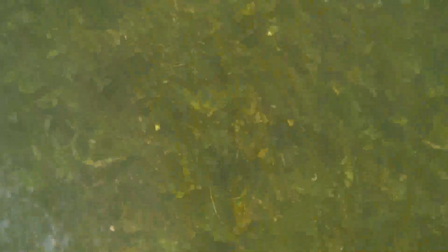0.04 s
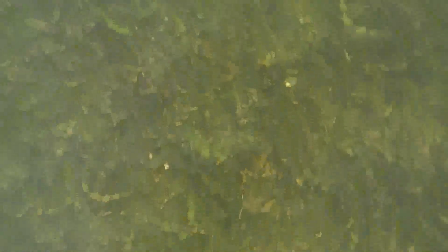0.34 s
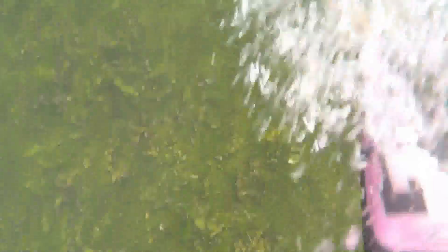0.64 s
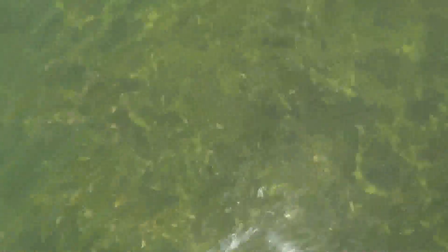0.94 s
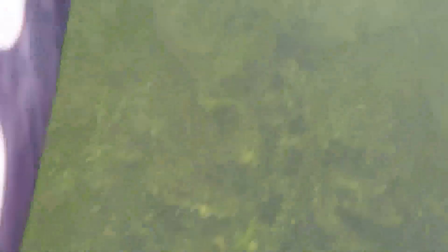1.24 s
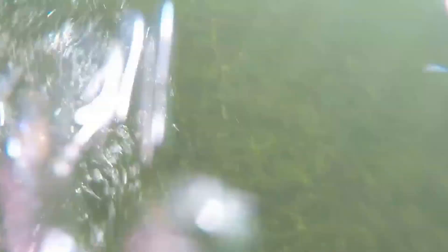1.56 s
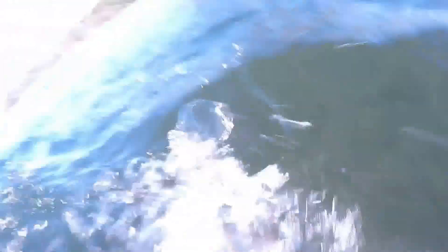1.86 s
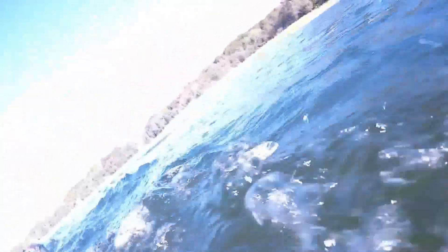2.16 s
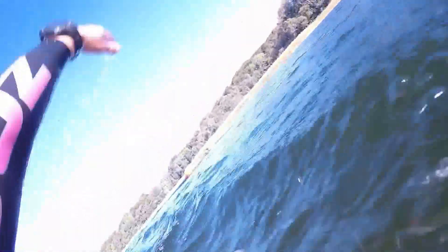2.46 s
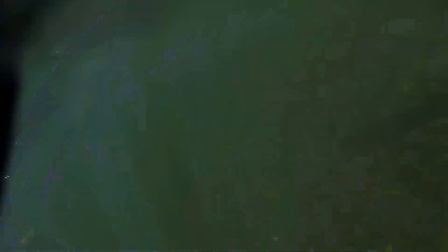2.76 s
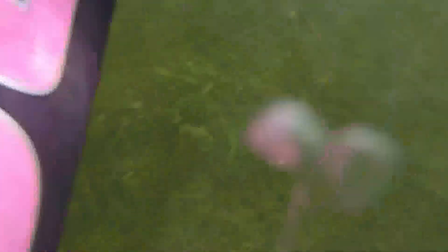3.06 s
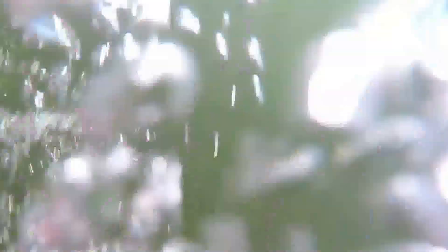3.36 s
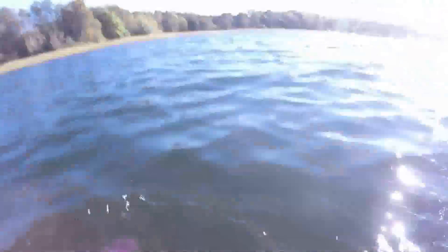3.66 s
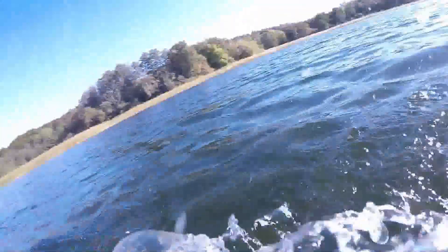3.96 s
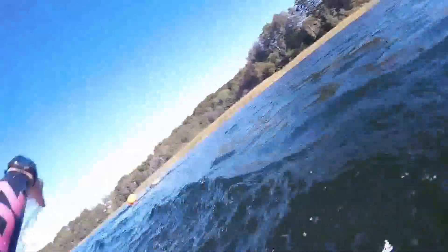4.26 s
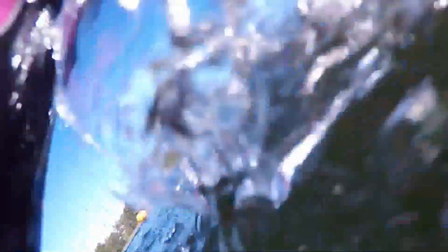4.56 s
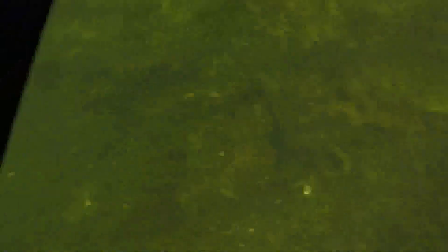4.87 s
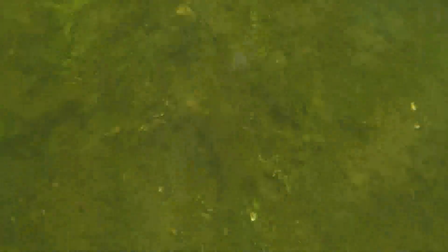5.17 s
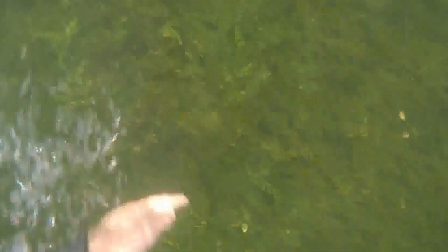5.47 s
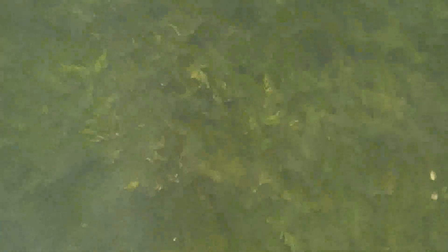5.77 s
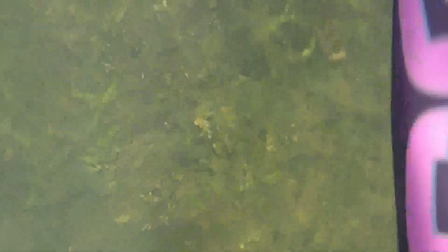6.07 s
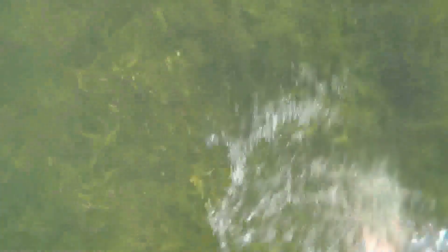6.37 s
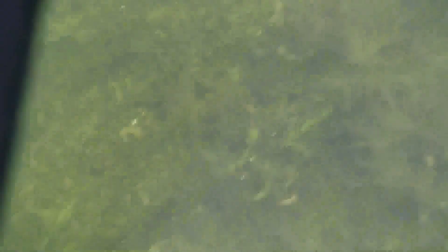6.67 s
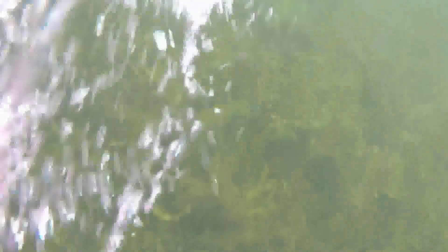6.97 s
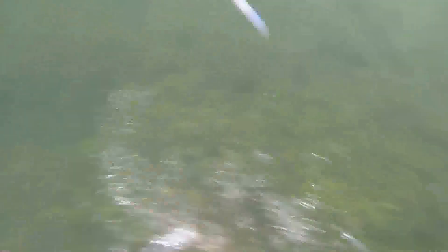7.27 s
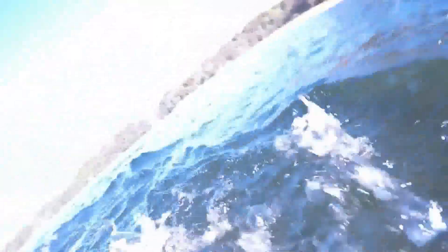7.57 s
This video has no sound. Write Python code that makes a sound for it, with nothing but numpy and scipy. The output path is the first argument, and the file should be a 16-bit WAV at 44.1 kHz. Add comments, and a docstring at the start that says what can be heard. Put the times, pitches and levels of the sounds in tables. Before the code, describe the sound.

A swimmer does front crawl in a lake, heard very close from a microphone worn on the body. It starts under water: big bubbles gurgle, small ones fizz and single ones plop over a low rumble, with drops smacking the housing, a thump near 0.9 seconds and a deep glug around 1.5. From about 1.9 to 2.4 seconds the microphone is in the air, hearing a soft, hissing wash. It plunges back with hard smacks, crackling spray and low thumps until about 3 seconds, followed by lighter bubbling. A second, quieter stretch above water runs from 3.5 to 4.5 seconds and ends in another sharp splash and thump. After a lull of faint bubbling with a few plops, the strokes pick up at 6 seconds. The flow surges with a deep glug just after 7 seconds, and from 7.4 a soft surface wash closes the sound.

```python
"""Front crawl in a lake, from the microphone of a camera worn by the swimmer. It starts under water:
strokes tear up froth and drag air down, so big bubbles gurgle, small ones fizz and single ones plop;
drops smack the housing and waves thump the microphone port. Near 2 s and 4 s it lifts into the air and
hears the soft wash of the wake, then plunges back among hard smacks and thumps. After a lull the strokes
pick up at 6 s, the flow surges just after 7 s, and the microphone ends in the air."""
import sys
import numpy as np
from scipy import signal
from scipy.fft import rfft, irfft, next_fast_len
from scipy.io import wavfile
from scipy.ndimage import uniform_filter1d, map_coordinates

SR = 44100
rng = np.random.default_rng(int(sys.argv[2]) if len(sys.argv) > 2 else 0)


def write(x):
    x = np.atleast_2d(x).T
    wavfile.write(sys.argv[1], SR, np.round(np.clip(x, -1, 1) * 32767).astype(np.int16))


N = 336027
TIME = np.arange(N) / SR

# Levels are relative within each column.
# clouds of air dragged under, an arm's length away: t/s, length/s, level/dB
AIR_CLOUDS = [(0.106, 0.076, -27.5), (0.418, 0.73, -22.5), (1.376, 0.33, -26), (2.757, 0.22, -26),
              (3.225, 0.15, -27), (4.663, 0.23, -23), (5.633, 0.034, -19.5), (6.077, 0.474, -31.5),
              (6.609, 0.033, -22), (6.727, 0.35, -26), (7.037, 0.2, -18.5)]
# the surface torn into froth: t/s, length/s, froth level/dB, spray level/dB
STROKE_SPLASHES = [(0, 0.16, -36.5, -46.5), (0.502, 0.577, -35.5, -42), (0.896, 0.16, -26, -58),
                   (1.606, 0.16, -23, -43), (2.408, 0.099, -23, -38), (2.514, 0.18, -21, -37),
                   (2.743, 0.09, -22, -27.5), (2.88, 0.14, -32.5, -54), (3.289, 0.19, -30, -43),
                   (4.466, 0.026, -21.5, -35), (4.567, 0.16, -26.5, -41), (4.652, 0.21, -23, -35),
                   (4.87, 0.98, -37.5, -51.5), (6.044, 0.21, -32, -49), (6.29, 0.17, -24, -37.5),
                   (6.458, 0.19, -28.5, -47.5), (7.074, 0.28, -27, -44.5)]
# single bubbles pinching off close to the housing: t/s, starting f/Hz, level/dB, t60/s
CLOSE_BUBBLES = [(0.133, 364, -1.5, 0.026), (0.1826, 518, -5.5, 0.015), (0.4343, 2720, -6.5, 0.0066),
                 (0.4648, 4230, -7, 0.0033), (0.5053, 560, -12.5, 0.13), (0.541, 530, -10.5, 0.071),
                 (0.576, 562, -7, 0.069), (0.622, 1470, -14.5, 0.019), (.6338, 580, -14, 0.041),
                 (0.778, 4170, -1.5, 0.0017), (0.796, 2920, -13, 0.02), (0.808, 533, -11.5, 0.098),
                 (1.0886, 560, -1.5, 0.024), (1.11, 357, 5, 0.009), (1.4273, 646, -0.5, 0.0058),
                 (1.5264, 2740, -14, .01), (1.676, 556, -10.5, 0.03), (1.7009, 3520, -12, 0.0087),
                 (1.755, 3050, 1, 0.0049), (1.8048, 767, -5.5, 0.033), (2.4348, 895, -18.5, .04),
                 (2.47, 3620, -9, 0.018), (2.4833, 1260, -5.5, 0.012), (2.5802, 3120, -10, 0.019),
                 (2.6653, 2430, -3.5, 0.011), (2.775, 2640, -6.5, 0.0086), (2.8691, 347, -0.5, 0.018),
                 (2.939, 330, -10, 0.027), (3.4725, 1680, -16.5, 0.011), (4.287, 1873, 2.5, 0.015),
                 (4.4896, 2640, 0, 0.012), (4.6148, 1000, -11.5, 0.011), (4.84, 547, -14, 0.063),
                 (5.6479, 330, -16, 0.053), (5.79, 8170, -13.5, 0.0033), (6.127, 292, -10, 0.031),
                 (6.3357, 1390, -6.5, 0.017), (6.4852, 598, -1, 0.018), (6.549, 2850, -12, 0.038),
                 (6.5623, 4470, 2.5, 0.0024), (6.6243, 368, -0.5, 0.015), (6.758, 1195, -12.5, 0.029),
                 (6.7796, 708, -11.5, 0.058), (6.88, 1220, -10, 0.041), (7.0744, 1090, -9, 0.043),
                 (7.102, 740, -5.5, 0.021), (7.142, 700, -7.5, 0.03), (7.191, 336, -11, 0.08),
                 (7.258, 1500, -8.5, 0.032), (7.2824, 2160, -10.5, .01), (7.326, 1900, -1, 0.01),
                 (7.354, 5060, -14.5, 0.0095), (7.3867, 4400, -7, 0.0028)]
# drops right on the housing: t/s, splat level/dB, crack level/dB
DROP_HITS = [(.2648, -22, -24), (.62, -20.5, -36), (.885, -16, -15.5), (1.0098, -6.5, -27),
             (1.042, -13, -13), (1.1959, -8.5, -15), (1.4117, -11, -29), (1.5998, -17.5, -22),
             (1.6597, -7, -12.5), (1.8037, -27, -14), (1.8432, -42, -16.5), (1.8667, -43, -14),
             (2.1605, -20.5, -36), (2.465, -8, -11), (2.5262, -4, 2), (2.621, -4, -12), (2.6353, -4, -19),
             (2.683, -19, -29), (2.7975, -12, -16), (2.8062, -2, -14), (2.8368, -8, -19), (4.4897, -3.5, 1),
             (4.5138, -8, -6), (4.652, -8.5, -16.5), (4.701, -8.5, -12), (4.72, -12.5, -14.5),
             (4.7916, -20, -16), (5.6905, -11.5, -15.5), (6.128, -17, -23), (6.2307, -23, -20),
             (6.2502, -11.5, -28), (6.4278, -13, -15), (6.55, -4, -14.5), (7.337, -10, -28.5)]
# large pockets of air: t/s, length/s, level/dB, settled f/Hz
AIR_POCKETS = [(0.348, 0.11, -22, 246), (0.467, 0.48, -29, 205), (1.439, 0.23, -15, 173.6),
               (2.928, 0.38, -40, 413), (3.265, 0.262, -32.5, 150.8), (6.98, 0.27, -13, 150)]
# waves right on the microphone port: t/s, level/dB, swing f/Hz
PORT_WAVES = [(0.938, -2.5, 37.7), (1.662, -26, 70), (2.56, -10, 74.6), (2.618, -5.5, 47.4), (2.8, 1, 54),
              (2.87, -6, 115), (4.7, 3, 74), (6.476, -3, 34.8)]
# water and air flowing past the housing: t/s, level/dB
FLOW_LEVELS = [(0, -27), (.6, -23.5), (1.1, -24), (1.32, -28.5), (1.72, -17.5), (1.95, -39.5),
               (2.25, -28.5), (2.7, -28.5), (3.13, -37), (3.35, -28.5), (3.8, -47), (4.1, -34), (4.7, -25),
               (5.2, -41), (6.2, -25), (6.65, -23), (6.9, -26), (7.17, -13), (7.45, -35.5)]
# microphone in the air, wake passing: from t/s, to t/s, crest t/s, crest half-width/s, level/dB
SURFACINGS = [(1.863, 2.402, 2.02, 0.55, -40), (3.522, 4.485, 4.08, 0.22, -46.5),
              (7.402, 7.697, 7.55, 0.33, -38)]

# Spectra, all f/Hz, level/dB:
HOUSING_BOOM = [(250, -4), (330, -7.5), (440, -4), (560, -2), (700, -1.5), (1000, -7)]  # the housing booming with the big bubbles
FIZZ_SPECTRUM = [(400, 4), (2900, 6.5), (5500, -13), (7500, -43), (15000, -23)]  # small bubbles, microphone under water
WASH_SPECTRUM = [(250, -18), (650, -1.5), (2300, 13), (3400, 10), (6000, -8), (15000, -16)]  # the wake, microphone in the air
SPRAY_SPECTRUM = [(2000, -10.5), (4200, 0.5), (6300, -2.5), (9000, -10.5), (13500, -9.5), (16000, -20.5)]  # cracking droplets
SPLAT_SPECTRUM = [(500, -10.5), (1300, 0.5), (2900, 2), (5000, -9.5), (15000, -80)]  # a drop flattening on the housing
SLOW_FLOW_SPECTRUM = [(30, -3.5), (55, -6), (110, -20.5), (200, -29.5), (3000, -110)]  # rumble of slow flow
FAST_FLOW_SPECTRUM = [(30, -6), (70, -9), (130, -6.5), (250, -18.5), (1500, -110)]  # eddies of fast flow

GURGLE_ATTACK_S, GURGLE_RELEASE_S = 0.016, 0.031
SPLASH_ATTACK_S, SPLASH_RELEASE_S = 0.032, 0.046
SPRAY_BUILD = 0.53  # share of a splash's length over which its spray builds
CALM_BIG_DB, CALM_SMALL_DB, CALM_SPRAY_DB = -34, -38.5, -56.5  # bubbles lingering between strokes
LAKE_DB = -49.5  # lapping of the open lake
WASH_BIG_DB, WASH_SPRAY_DB = -11.5, -16  # relative to the wash
DEEP_CLIMB_PER_S, SURFACE_CLIMB_PER_S = 0.71, 15.5  # a plop's relative pitch climb; extra at the surface
PINCH_SPLAT_DB, PINCH_CRACK_DB = -20.5, -37  # offsets from a plop's level
GLUG_SAG, GLUG_SAG_S = 0.5, 0.032  # a pocket starts this share above its pitch; settling time
SLOW_FLOW_DB, FAST_FLOW_DB = -28.5, -11.5  # between these the flow turns turbulent
TAIL_T60_S, DROPLET_DECAY_S = 0.03, 0.00069
MIST_DB = -16.5  # haze of tiny bubbles under the droplets
TOP_HZ = 15600


def strokes():
    """The arms add air clouds and froth to the lingering bubbles; above water the wake washes by."""
    in_air, depth = immersion()
    under = 1 - in_air
    wake = sum(amp(db) * np.exp(-((TIME - crest) / width) ** 2) for _, _, crest, width, db in SURFACINGS)
    wash = in_air * (amp(LAKE_DB) + wake)
    clouds = sum(amp(db) * burst(s, length, GURGLE_ATTACK_S, GURGLE_RELEASE_S)
                 for s, length, db in AIR_CLOUDS)
    big = [amp(CALM_BIG_DB) * depth, amp(WASH_BIG_DB) * wash, clouds]
    small = [amp(CALM_SMALL_DB) * under, wash]
    tiny = [amp(CALM_SPRAY_DB) * under, amp(WASH_SPRAY_DB) * wash]
    spurts = amp(5.2 * np.tanh(wobble(45)))  # spray flies off unevenly
    for s, length, froth_db, spray_db in STROKE_SPLASHES:
        small.append(amp(froth_db) * burst(s, length, SPLASH_ATTACK_S, SPLASH_RELEASE_S))
        tiny.append(amp(spray_db) * spurts * burst(s, length, SPRAY_BUILD * length, SPLASH_RELEASE_S))
    big_db, small_db, tiny_db = (decibels(np.linalg.norm(parts, axis=0)) for parts in (big, small, tiny))
    muffling = (big_db - small_db) / 20  # a thick cloud of big bubbles swallows the treble
    return gurgle(big_db, in_air) + fizz(small_db, in_air, muffling) + spray(tiny_db)


def gurgle(db, in_air):
    """Big bubbles roll past and the housing booms; fainter with the microphone in the air."""
    big = swarm(rate=430, low_hz=237.6, high_hz=858, cycles=8.3, spread_db=5.5, samples=2000)
    return amp(db - 2 - 2 * in_air) * even(colour(big, HOUSING_BOOM), seconds=0.26)


def fizz(db, in_air, muffling):
    """Small bubbles plink in calm water and thicken to froth in a splash; from the air, a soft wash."""
    plinks = swarm(rate=270, low_hz=900, high_hz=6500, cycles=20, spread_db=6.5, samples=800, rise=0.12)
    dense = swarm(rate=1500, low_hz=700, high_hz=9000, cycles=13, spread_db=5, samples=600)
    froth = unit(dense + rng.standard_normal(N) / 2)
    froth_share = np.clip((db + 40) / 40, 0.3, 0.6)
    bubbles = blend(unit(scatter(plinks, wet_db=-1.5)), froth, froth_share)
    clumps = bubbles * amp(4 * wobble(70))
    bright = even(colour(clumps, FIZZ_SPECTRUM), seconds=0.029)
    dull = unit(signal.sosfilt(signal.butter(2, 2300, fs=SR, output="sos"), bright))
    submerged = blend(bright, dull, muffling)
    hiss = colour(0.64 * dense + rng.standard_normal(N), WASH_SPECTRUM)
    wash = unit(hiss * amp(3.8 * wobble(37)))
    return amp(db) * blend(submerged, wash, in_air)


def spray(db):
    """Droplets crack and ping singly, and crowd into a crackle where a sheet of water collapses."""
    pings = swarm(rate=110, low_hz=3800, high_hz=13000, cycles=20, spread_db=8, samples=400)
    pings = unit(scatter(pings, wet_db=-6))
    sparse = droplets(rate=80, spread_db=9, patchy_db=8.5)
    dense = droplets(rate=360, spread_db=6, patchy_db=9)
    single = even(colour(pings + 0.81 * sparse, SPRAY_SPECTRUM), seconds=0.15)
    crowd = even(colour(dense, SPRAY_SPECTRUM), seconds=0.058)
    mist = colour(rng.standard_normal(N), SPRAY_SPECTRUM)
    return amp(db + 2) * (blend(single, crowd, share=(db + 46) / 20) + amp(MIST_DB) * mist)


def plops():
    """Close up, a bubble pinches off with a splat and rings; near the surface it chirps upwards."""
    rings, pinches = np.zeros(N), []
    t = np.arange(SR // 10) / SR
    _, depth = immersion()
    for s, hz, db, t60 in CLOSE_BUBBLES:
        climb = DEEP_CLIMB_PER_S + SURFACE_CLIMB_PER_S * (1 - depth[int(s * SR)]) ** 2
        add(rings, s, amp(db + 7.5) * bubble(t, hz, t60, rise=climb * t60))
        brightness_db = decibels(min(hz / 3000, 1))  # the smallest crack brightly
        pinches.append((s, db + PINCH_SPLAT_DB, db + PINCH_CRACK_DB + brightness_db))
    return rings + smacks(pinches)


def smacks(drops):
    """Right at the microphone, a drop cracks, splats and shatters into seven tiny bubbles."""
    rings, splats, cracks = np.zeros((3, N))
    t = np.arange(SR // 10) / SR
    for s, splat_db, crack_db in drops:
        shards_hz = 2400 * np.exp(0.494 * rng.standard_normal((7, 1)))
        delay = 0.0027 * rng.exponential(size=(7, 1))  # they pinch off one after another
        shards = bubble(np.maximum(t - delay, 0), shards_hz, t60=26 / shards_hz, rise=0.19)
        add(rings, s, amp(splat_db - 2) * (np.exp(-delay / 0.013) * shards).sum(axis=0))
        add(splats, s, amp(splat_db - 2.5) * rng.standard_normal(len(t)) * np.exp(-t / 0.0036))
        add(cracks, s, amp(crack_db) * rng.standard_normal(len(t)) * np.exp(-t / 0.001))
    return rings + colour(splats, SPLAT_SPECTRUM) + colour(cracks, SPRAY_SPECTRUM)


def glugs():
    """A large air pocket and a smaller one throb unevenly, fall in pitch as they fill, and fade."""
    out = np.zeros(N)
    for ratio, size_db in [(1, -1.5), (1.6, -16)]:
        waver, throb = np.exp(0.0974 * wobble(110)), amp(3.7 * wobble(70))
        for s, length, db, hz in AIR_POCKETS:
            span = slice(int(s * SR), int((s + length) * SR))
            t = TIME[span] - TIME[span][0]
            pitch = ratio * hz * waver[span] * (1 + GLUG_SAG * np.exp(-t / GLUG_SAG_S))
            tone = np.sin(2 * np.pi * np.cumsum(pitch) / SR)
            envelope = np.sqrt(np.abs(np.sin(np.pi * t / length))) * np.exp(-t / length)
            add(out, s, amp(db + size_db) * unit(envelope * throb[span] * tone))
    return out


def thumps():
    """Each wave pushes the microphone port in, lets it swing back and leaves eddies."""
    out = np.zeros(N)
    t = np.arange(SR // 5) / SR
    for s, db, hz in PORT_WAVES:
        age = hz * t / 0.46  # the envelope peaks after 0.46 cycles
        push = np.sin(2 * np.pi * hz * t) * age ** 2 * np.exp(2 * (1 - age))
        eddies = colour(rng.standard_normal(len(t)), [(220, 1), (9000, -87)]) * np.exp(-t / 0.044)
        add(out, s, amp(db) * (push + amp(-13.5) * eddies))
    return out


def flow():
    """Behind it all, flow buffets the housing: a low rumble that breaks into eddies at speed."""
    db = np.interp(TIME, *np.transpose(FLOW_LEVELS))
    slow = unit(colour(rng.standard_normal(N), SLOW_FLOW_SPECTRUM))
    fast = unit(colour(rng.standard_normal(N), FAST_FLOW_SPECTRUM))
    turbulence = (db - SLOW_FLOW_DB) / (FAST_FLOW_DB - SLOW_FLOW_DB)
    return amp(db) * unit(blend(slow, fast, turbulence) * amp(4.7 * wobble(15)))


def immersion():
    """Microphone position: how far it is in the air, and how deep it has sunk; both 0-1."""
    above = sum(((TIME > start) & (TIME < end)).astype(float) for start, end, *_ in SURFACINGS)
    in_air = uniform_filter1d(above, SR // 30)
    depth = np.clip(1 - 2 * uniform_filter1d(above, SR), 0, 1)
    return in_air, depth


def bubble(t, hz, t60, rise):
    """A bubble pinches off within a cycle and rings, its pitch climbing by the share rise per t60."""
    age = t / t60
    phase = 2 * np.pi * hz * t * (1 + rise * np.minimum(age, 2) / 2)
    return np.sin(phase) * np.exp(-np.log(1000) * age) * (1 - np.exp(-2 * hz * t)) ** 2


def swarm(rate, low_hz, high_hz, cycles, spread_db, samples, rise=0.21):
    """Random bubbles, rate a second, each dying away over roughly that many cycles; rms 1."""
    when, pitch, rank, ring = np.hsplit(rng.random((int(rate * N / SR), 4), dtype=np.float32), 4)
    hz = low_hz * (high_hz / low_hz) ** pitch
    strength = amp(-spread_db * np.log(rank + 0.02)) * np.sqrt(hz)
    t = np.arange(samples, dtype=np.float32) / SR
    rings = strength * bubble(t, hz, cycles * (0.5 + ring) / hz, rise)
    where = (when * N).astype(int) + np.arange(samples)
    return unit(np.bincount(where.ravel() % N, rings.ravel(), N))


def droplets(rate, spread_db, patchy_db):
    """Random cracks, rate a second, each with its own colour: many faint, a few loud; rms 1."""
    when, rank = rng.random((int(rate * N / SR), 2)).T
    hits = np.bincount((when * N).astype(int), amp(-spread_db * np.log(rank + 0.02)), N)
    envelope = signal.lfilter([1], [1, -np.exp(-1 / (DROPLET_DECAY_S * SR))], hits)
    spectra = signal.stft(envelope * rng.standard_normal(N), nperseg=128)[2]
    tint = uniform_filter1d(rng.standard_normal(spectra.shape), size=7, axis=0)
    tint = unit(uniform_filter1d(tint, size=4, axis=1))
    return unit(signal.istft(spectra * amp(patchy_db * tint), nperseg=128)[1][:N])


def scatter(x, wet_db):
    """The housing rings on briefly, smearing each ring with a short, ever-changing tail."""
    t = np.arange(SR // 40) / SR
    block = SR // 20
    out = x.copy()
    for start in range(0, N, block):
        tail = rng.standard_normal(len(t)) * amp(-60 * t / TAIL_T60_S)
        smeared = signal.fftconvolve(x[start:start + block], tail / np.linalg.norm(tail))
        add(out, start / SR, amp(wet_db) * smeared)
    return out


def colour(x, points):
    """Causal filter through (f/Hz, level/dB) points; white noise keeps its power."""
    size = 2 * next_fast_len(len(x) // 2 + 4096)
    hz, db = np.transpose(points)
    gain = unit(amp(np.interp(np.log(np.fft.rfftfreq(size, 1 / SR) + 1), np.log(hz), db)))
    cepstrum = irfft(np.log(gain))
    cepstrum[1:size // 2] *= 2
    cepstrum[size // 2 + 1:] = 0
    return irfft(rfft(x, size) * np.exp(rfft(cepstrum)))[:len(x)]


def even(x, seconds):
    """Hold the rms near 1 over any stretch of this length."""
    size = int(seconds * SR)
    power = uniform_filter1d(uniform_filter1d(x * x, size), size)
    return x / np.sqrt(np.abs(power) + 1e-6)


def blend(a, b, share):
    """Cross-fade from a to b at constant power."""
    share = np.clip(share, 0, 1)
    return np.sqrt(1 - share) * a + np.sqrt(share) * b


def burst(s, length, attack, release):
    """A rise at time s, a hold until the length is over, and an exponential fall."""
    return np.clip((TIME - s) / attack, 0, 1) * np.exp(-np.maximum(TIME - s - length, 0) / release)


def wobble(rate):
    """A smooth random curve, rate knots a second."""
    return map_coordinates(rng.standard_normal(int(N * rate / SR) + 2), [TIME * rate])


def add(track, s, sound):
    """Mix a sound into the track at time s."""
    part = track[round(s * SR):][:len(sound)]
    part += sound[:len(part)]


def amp(db):
    return 10 ** (np.asarray(db) / 20)


def decibels(x):
    return 20 * np.log10(np.abs(x) + 1e-6)


def unit(x):
    return x / np.sqrt(np.mean(x ** 2) + 1e-20)


def scene():
    """The water as it reaches the one microphone on the swimmer."""
    return (plops() + smacks(DROP_HITS) + strokes() + glugs() + flow() + thumps())[None]


def record(dry):
    """The loudest hits overload the microphone; the treble ends steeply at TOP_HZ."""
    clipped = dry / (1 + np.abs(dry) ** 6) ** (1 / 6)
    low_pass = 1 / (1 + (np.fft.rfftfreq(N, 1 / SR) / TOP_HZ) ** 120)
    return irfft(rfft(clipped) * low_pass, N)


dry = scene()
out = record(dry)
write(out)
```